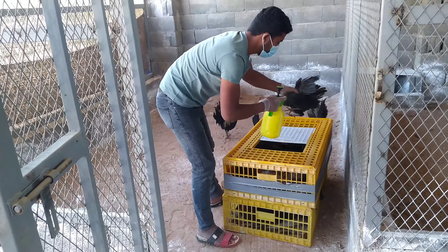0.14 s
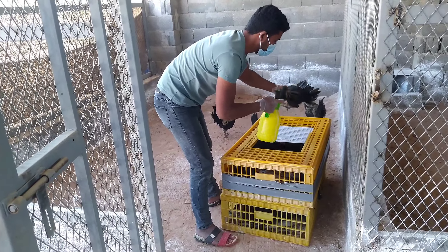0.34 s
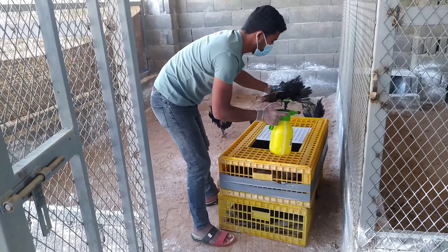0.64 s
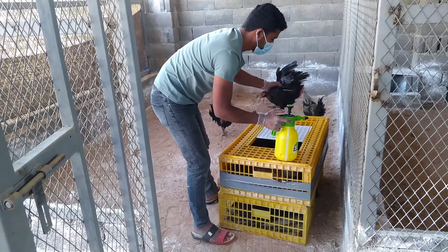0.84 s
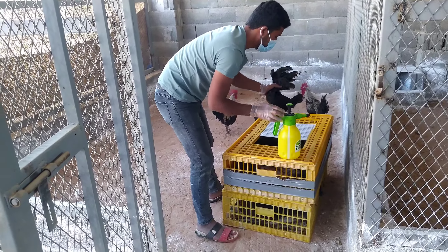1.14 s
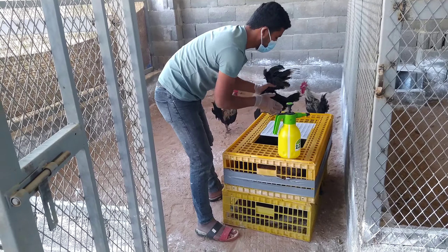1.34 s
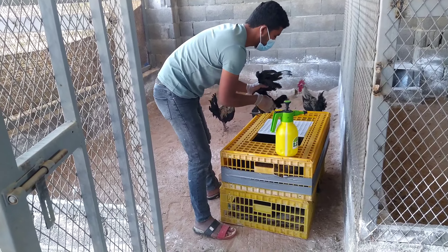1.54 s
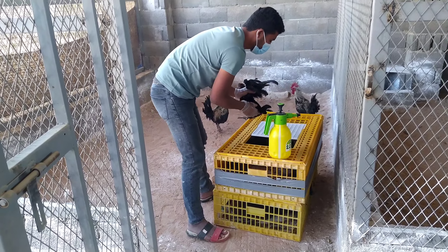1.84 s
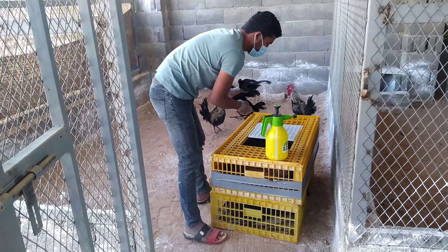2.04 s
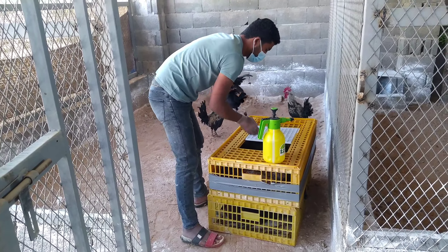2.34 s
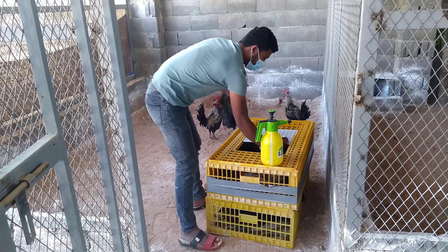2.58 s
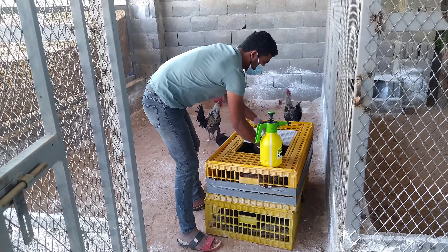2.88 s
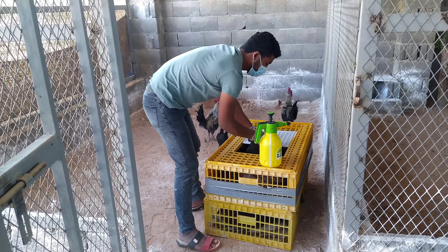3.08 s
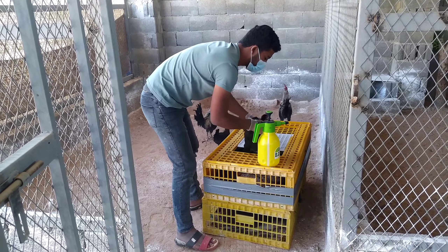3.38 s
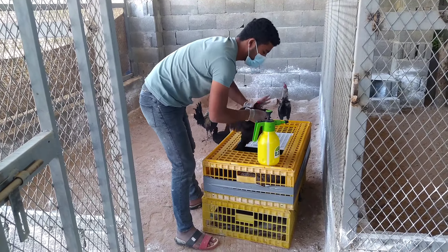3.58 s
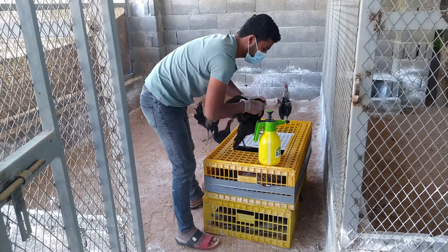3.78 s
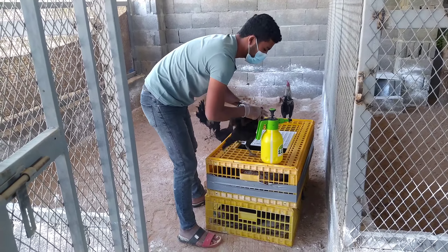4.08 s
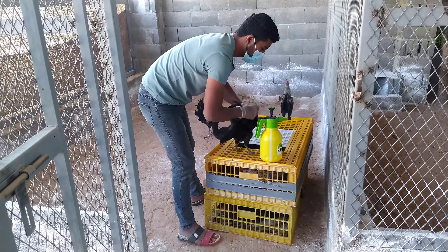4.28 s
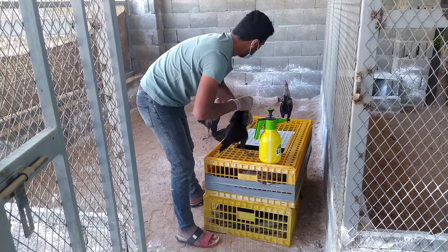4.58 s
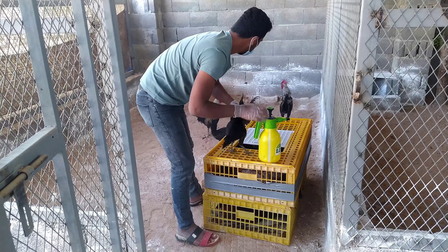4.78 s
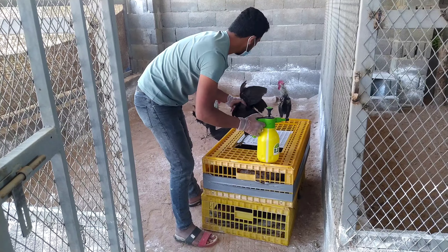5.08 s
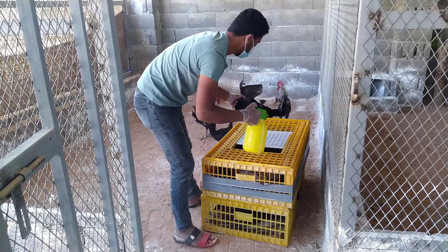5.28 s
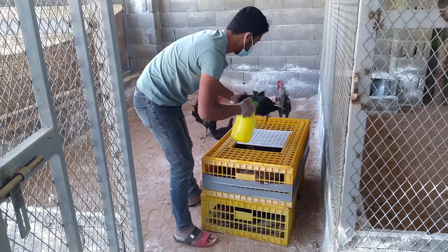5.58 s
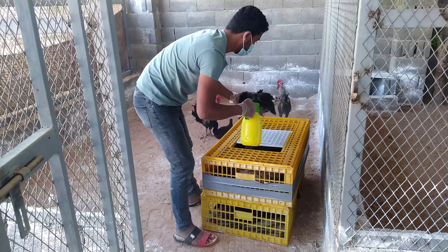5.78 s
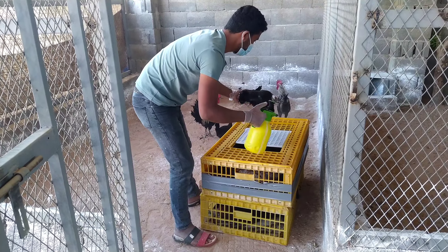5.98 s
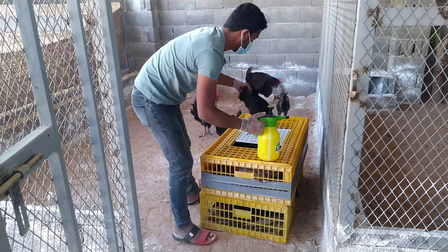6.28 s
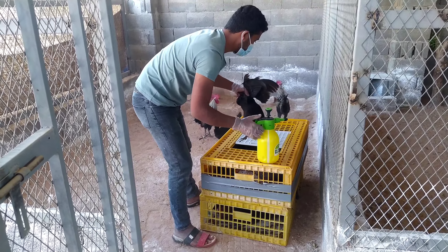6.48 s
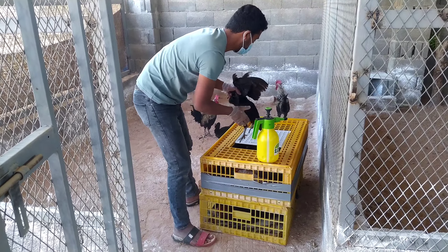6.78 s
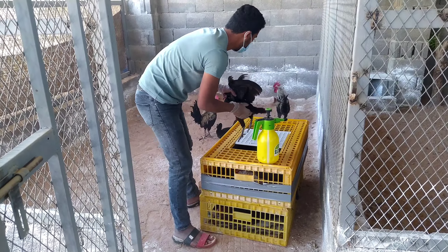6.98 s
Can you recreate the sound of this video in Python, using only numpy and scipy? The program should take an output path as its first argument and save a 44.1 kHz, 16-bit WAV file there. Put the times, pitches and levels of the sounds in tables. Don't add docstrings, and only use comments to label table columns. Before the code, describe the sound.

A stereo phone captures a chicken pen with hard walls, short bright echoes, hissy air and a blurred distant flock. A short peep and a cluck open, then a hoarse squawk until 0.4 s, another at 0.6-0.95 and a third at 1.25-1.5. From 0.9 a second bird clucks about five times a second, with dull plastic bumps and soft rustles. A rasp swells from 1.9 to 2.2, then a short grunt at 2.5. Claws scrabble at 2.8; a piercing, loud scream bursts at 2.95-3.15 and a second at 3.3-3.6, with a crate thump. After a brief lull, wings swish and a long strained cry runs 3.85-4.5, its clear note breaking through the rasp. A softer squawk fills 4.8-5.25. Steady clucks return from 5.2 to 6.2, with faint neighbours and thin whistles. Brushing and a knock come at 6.5, then low groans beneath a last hoarse squawk to 7.1.

```python
import sys
import numpy as np
from scipy import signal
from scipy.fft import rfft, irfft, next_fast_len
from scipy.io import wavfile
from scipy.ndimage import uniform_filter1d

SR = 44100
rng = np.random.default_rng(int(sys.argv[2]) if len(sys.argv) > 2 else 0)


def volts(x):
    e = np.asarray(x, float) / 20
    return 10 ** e


def generate_wav(signal):
    frames = np.transpose(np.atleast_2d(signal))
    scaled = np.clip(frames, -1, 1) * 32767
    pcm = np.round(scaled).astype(np.int16)
    wavfile.write(sys.argv[1], SR, pcm)


N = 314433

# (start [s], length [s], start pitch [Hz], end pitch [Hz], level of the lowest partial [dB])
LOCKED_NOTES = [
    (0.215, 0.09, 715, 652, -37),
    (2.97, 0.15, 712, 700, -29),
    (3.348, 0.108, 710, 701, -29.5),
    (4.11, 0.14, 745, 735, -36),
]


def evened(x):
    return x / np.sqrt(np.mean(x ** 2) + 1e-20)


def read(points, hz):
    f, value = np.transpose(points)
    return np.interp(np.log(hz + 1), np.log(f + 1), value)


def shaped(x, points):
    size = next_fast_len(len(x))
    gain = volts(read(points, np.fft.rfftfreq(size, 1 / SR)))
    return irfft(rfft(x, size) * gain, size)[:len(x)]


def add(mix, s, sound):
    part = mix[round(s * SR):][:len(sound)]
    part += sound[:len(part)]


def resonate(x, hz, width_hz):
    turn = np.exp(2j * np.pi * np.cumsum(hz * np.ones(len(x))) / SR)
    r = np.exp(-np.pi * width_hz / SR)
    smooth = signal.lfilter([(1 - r) ** 2], [1, -2 * r, r * r], x / turn + 1e-18)
    return 2 * (turn * smooth).real


def wobble(count, seconds):
    return evened(uniform_filter1d(rng.standard_normal(count), max(round(seconds * SR), 1)))


def both_ports(a, b, hz):
    # (frequency [Hz], likeness at both ports [0-1])
    likeness = [(30, .4), (90, .85), (200, .96), (700, .93), (1300, .3), (5000, .1)]
    same = np.clip(read(likeness, hz), -1, 1)[:, None]
    return np.array([a, same * a + np.sqrt(1 - same ** 2) * b])


def background(colour, patch_db, swell):
    # (frequency [Hz], share [0-1])
    gusty = [(60, .15), (300, .5), (1000, .8), (4000, .6), (8000, .3)]
    # (frequency [Hz], share [0-1])
    swell_share = [(500, 0), (2500, 1)]
    frames, hz = N // 256 + 5, np.fft.rfftfreq(1024, 1 / SR)
    a, b, c, d, patches = rng.standard_normal((frames, 513, 5)).T
    patches = evened(uniform_filter1d(uniform_filter1d(patches, 6, 0), 12, 1))
    frame_s = (np.arange(frames) - 2) * 256 / SR
    level_db = read(colour, hz)[:, None] + patch_db * patches * read(gusty, hz)[:, None]
    level_db = level_db + read(swell_share, hz)[:, None] * np.interp(frame_s, *np.transpose(swell))
    z = both_ports(a + 1j * b, c + 1j * d, hz) * volts(level_db)
    return evened(signal.istft(z, nperseg=1024, noverlap=768)[1][:, :N])


def yard():
    # (frequency [Hz], level per Hz [dB])
    air_colour = [(12, -24), (20, 3.5), (119, -7), (352, -1), (491, -9.5), (857, -13.5), (1040, -29),
                  (1720, -15), (2540, -12.5), (4070, -18.5), (5090, -18.5), (7100, -19), (9120, -11.5),
                  (12400, -26), (15500, -32)]
    # (time [s], level change [dB])
    treble_swell = [(0, 3), (.5, 7.5), (1, 2), (1.7, 2), (2.3, 3.5), (3.7, 1), (4.65, 5), (5.3, 1.5),
                    (5.55, -4.5), (5.7, 4.5), (6.1, 2), (6.4, -3), (6.6, 3.5), (7.13, 5)]
    # (time [s], level [dB])
    flock = [(0.0, -38), (.5, -48.5), (1.81, -51), (2.08, -36), (2.28, -46.5), (3.39, -33.5), (3.81, -47.5),
             (4.21, -28), (4.67, -48), (5.04, -28), (5.2, -39), (5.6, -44), (6.12, -52), (6.55, -49),
             (6.91, -28.5), (7.13, -34.5)]
    flock_colour = [(250, -23.0), (400, -15.5), (850, -1.0), (1400, -1.5), (2500, -4.0), (3500, -21.5)]  # (Hz, dB)
    air = background(air_colour, patch_db=6.5, swell=treble_swell)
    far = background(flock_colour, patch_db=4.5, swell=[(0, 0)])
    flock_db = np.interp(np.arange(N) / SR, *np.transpose(flock))
    return volts(-50.5) * air + volts(flock_db - 6.0) * far


def knocks():
    # (time [s], peak level [dB], panel pitch [Hz], time to die away by 60 dB [s])
    bumps = [(0.681, -37, 177, 0.035), (1.095, -39, 299, 0.058), (2.575, -35, 300, 0.038),
             (2.809, -43, 336, 0.16), (2.86, -37.5, 150, 0.077), (3.081, -42.5, 166, 0.16),
             (3.304, -24, 317, 0.031), (4.0, -39, 268, 0.033), (5.011, -40.5, 310, 0.043),
             (6.518, -44, 261, 0.054), (6.987, -48, 313, 0.065), (1.798, -51, 171, .08),
             (0.13, -49, 200, .08), (2.64, -48, 172, 0.074)]
    # (time [s], peak level [dB])
    claws = [
        (0.1878, -33),
        (1.085, -50),
        (1.166, -40),
        (1.6674, -39.5),
        (2.809, -26.5),
        (2.834, -34),
        (2.8767, -29.5),
        (3.306, -34),
        (3.834, -55),
        (6.542, -42),
    ]
    out, t = np.zeros(N), np.arange(9000) / SR
    for s, db, hz, t60 in bumps:
        modes = [(1, 4.5), (1.6, -10), (2.7, -3)]  # (times the panel pitch, dB)
        panel = sum(volts(d) * np.sin(2 * np.pi * hz * k * t) for k, d in modes)
        add(out, s, volts(db - 60 * t / t60) * panel * (1 - np.exp(-t / 0.00095)))
    for s, db in claws:
        grit = uniform_filter1d(rng.standard_normal(len(t)), size=2)
        add(out, s, volts(db + 7.5 - 60 * t / 0.023) * np.minimum(t / 0.001, 1) * grit)
    return out


def brushing():
    # (start [s], length [s], peak level [dB])
    rustles = [
        (1.069, 0.19, -43.5),
        (1.629, 0.22, -48),
        (2.784, 0.89, -42),
        (0.182, 0.039, -56),
        (3.987, 0.072, -37.5),
        (5.2, .08, -50),
        (6.512, 0.081, -39.5),
    ]
    # (start [s], length [s], peak level [dB])
    wings = [
        (3.865, 0.068, -43),
        (4.02, .07, -35),
        (4.19, .07, -35),
        (2.955, 0.037, -32),
    ]
    # (frequency [Hz], level per Hz [dB])
    brush_colour = [(88, -45), (150, 2.5), (701, -4.5), (1700, -5.5), (1870, -6), (2360, -6), (3750, -18),
                    (8920, -13), (15000, -43)]
    # (frequency [Hz], level per Hz [dB])
    swish_colour = [(900, -40), (2000, -8), (5000, 5), (8000, -4), (13000, -18)]
    out = np.zeros(N)
    for rows, colour in [(rustles, brush_colour), (wings, swish_colour)]:
        for s, seconds, peak_db in rows:
            t = np.arange(0, seconds, 1 / SR)
            stroke = np.minimum(t / 0.015, 1) * volts(peak_db - 22 * t / seconds)
            grains = rng.standard_normal(len(t)) * volts(1.7 * wobble(len(t), 0.0061))
            add(out, s, stroke * evened(shaped(grains, colour)))
    return out


def cluck(s, db, hz, low_db, seconds):
    # (frequency [Hz], width [Hz], level [dB])
    throat_tones = [(870, 363, 15), (1330, 166, 3), (2340, 3400, -15.5), (4320, 230, -26)]
    # (time [s], share of rise and breath [0-1])
    looseness = [(5.7, 1), (5.76, .5), (5.9, 1)]
    lead_in_s = .006
    u = np.arange(0, 1, 1 / ((seconds + lead_in_s) * SR))
    loose = np.interp(s, *np.transpose(looseness))
    rise = 0.2022 * (np.sin(np.pi * .65 * u) - .75) + 0.076 * wobble(len(u), 0.0023)
    turns = np.cumsum(hz / 2 * (1 + loose * rise)) / SR
    pulses = sum(np.cos(2 * np.pi * k * turns) for k in range(2, 10))
    pulses = pulses + 2.23 * loose * rng.standard_normal(len(u))
    throat = evened(sum(volts(d) * resonate(pulses, f, w) for f, w, d in throat_tones))
    voice = throat + volts(low_db - 2.0) * np.cos(2 * np.pi * turns)
    throb = 1 + .28 * np.cos(2 * np.pi * (70 * u * seconds + rng.random()))
    shape = np.sin(np.pi * u ** 0.95) ** 1.92 * throb * volts(1.84 * wobble(len(u), 0.0085))
    return s - .007 - lead_in_s, volts(db - 4.5) * voice * shape


def neighbours():
    # (time [s], peak level [dB], second partial [Hz], lowest partial against it [dB], length [s])
    faint_clucks = [
        (5.30, -47, 1000, -20, .05),
        (5.44, -47, 1400, -25, .05),
        (5.51, -43, 1350, -25, .05),
        (5.70, -48, 800, -20, .06),
        (5.70, -48, 1500, -25, .04),
        (5.85, -50, 1150, -25, .06),
        (6.01, -47, 1430, -25, .05),
    ]
    out = np.zeros(N)
    for s, db, hz, low_db, seconds in faint_clucks:
        start, sound = cluck(s, db, hz, low_db, seconds)
        add(out, start, 2 * resonate(sound, hz, 500))
    return out


def clucking_bird():
    # (time [s], peak level [dB], second partial [Hz], lowest partial against it [dB], length [s])
    beat = [(0.114, -28.5, 896, -9.5, 0.046), (0.914, -33, 780, -9, 0.049), (1.078, -26, 872, -18, 0.054),
            (1.275, -31.5, 764, -11, 0.062), (1.454, -27.5, 802, -14.5, 0.05),
            (1.642, -24.5, 935, -21, 0.058), (1.834, -26, 849, -17, 0.054), (2.052, -30, 872, -17.5, 0.073),
            (2.215, -38, 829, 10, 0.077), (2.245, -21.5, 910.5, -11, 0.065),
            (2.453, -26, 834, -17.5, 0.056), (2.653, -30, 772, -11.5, 0.062), (2.831, -27, 806, -14, 0.044),
            (2.93, -24.5, 900, -33, 0.049), (3.233, -24.5, 994, -19, 0.068), (4.573, -38, 650, 0.5, 0.053),
            (4.711, -43, 1003, -30, 0.048), (4.771, -27, 828, -14, 0.048), (5.172, -26.5, 950, -12, 0.048),
            (5.37, -22.5, 913.5, -12, 0.047), (5.561, -23.5, 837, -16, 0.061),
            (5.766, -25.5, 804.5, -14, 0.074), (5.956, -23, 870, -13, 0.057),
            (6.201, -22.5, 914, -16, 0.048)]
    out = np.zeros(N)
    for row in beat:
        add(out, *cluck(*row))
    return out


def tone(s, seconds, start_hz, end_hz, db, partials, unsteady, soft, flicker_db=0):
    count = round(seconds * SR)
    u = np.linspace(0, 1, count)
    glide_hz = np.linspace(start_hz, end_hz, count)
    turns = np.cumsum(glide_hz * (1 + unsteady * wobble(count, 0.0079))) / SR
    stack = volts(flicker_db * wobble(count, .012)) * np.sin(2 * np.pi * turns)
    for k, d, strongest_at in partials:
        bloom = np.exp(-((u - strongest_at) / .28) ** 2 / 2)
        flicker = volts(d + flicker_db * wobble(count, 0.016))
        stack = stack + flicker * bloom * np.sin(2 * np.pi * round(k) * turns)
    return s, np.sqrt(2) * volts(db - 1.5) * stack * signal.windows.tukey(count, np.clip(soft, 0, 1))


def groans():
    # (start [s], length [s], start pitch [Hz], end pitch [Hz], level [dB])
    low_calls = [
        (6.735, .04, 215, 185, -50),
        (6.77, .12, 168, 155, -51),
        (6.99, .135, 158, 163, -52),
        (6.54, .07, 165, 165, -57),
    ]
    out = np.zeros(N)
    for row in low_calls:
        add(out, *tone(*row, [(2, -1.1, 0.36)], unsteady=0.021, soft=0.35, flicker_db=2.0))
    return out


def whistles():
    # (start [s], length [s], start pitch [Hz], end pitch [Hz], level [dB])
    peeps = [
        (0.061, 0.025, 1475, 1447, -27),
        (0.49, 0.12, 1195, 1237, -53.5),
        (0.939, .08, 766, 780, -58),
        (1.472, 0.23, 2920, 2950, -49.5),
        (5.513, 0.042, 1324, 1424, -45),
        (5.805, 0.138, 786, 824, -43.5),
        (4.708, .035, 950, 1013, -42.5),
        (5.428, .05, 1460, 1360, -51),
        (5.688, 0.053, 1240, 1330, -47.5),
    ]
    out = np.zeros(N)
    for row in peeps:
        add(out, *tone(*row, [], unsteady=0.0032, soft=0.35))
    return out


def clear_notes():
    # (multiple, level [dB], share of the note where it is strongest [0-1])
    partials = [
        [(2, -5, 0.55), (3, 7, 0.85), (4, 10, 0.77), (5, -7, .6)],
        [(2, -16, .4), (3, 9, 0.18), (4, -8, .6), (6, -12, 0.63)],
        [(2, -8, .3), (3, 6.5, 0.61), (4, 6, 0.83), (5, 1, 0.58), (6, -4, .6), (8, -10, .5), (10, -5.5, 0.52),
         (12, 1, 0.6)],
        [(2, 9, 0.43), (3, 14, 0.45), (4, -12, .5)],
    ]
    tremble = (.012, .018, .008, .016)
    # (start [s], length [s], start pitch [Hz], end pitch [Hz], level [dB])
    streaks = [(0.078, 0.05, 1800, 1920, -32.5), (0.12, 0.048, 1950, 1800, -29),
               (.17, 0.069, 1400, 1560, -34), (0.1, 0.072, 3880, 3860, -39),
               (0.14, 0.026, 2700, 2350, -33.5), (.2, .06, 2000, 2150, -33),
               (.26, 0.061, 2050, 1750, -34.5), (4.15, 0.066, 1530, 1480, -34),
               (4.19, 0.038, 1680, 1695, -33), (3.995, 0.0346, 2180, 2600, -27),
               (4.045, 0.0524, 920, 930, -33), (3.325, 0.054, 2150, 2125, -32),
               (3.505, .065, 2100, 2095, -29), (3.51, .05, 2810, 2790, -28), (3.1, .04, 2690, 1900, -30),
               (2.985, 0.116, 1560, 1555, -23.5), (2.96, 0.164, 1900, 1905, -30),
               (2.98, .12, 2745, 2765, -25.5), (3.04, 0.062, 4135, 4140, -29),
               (3.0, 0.039, 2065, 2055, -21), (2.955, 0.027, 4650, 4650, -28),
               (4.06, .05, 940, 1000, -30.5), (4.24, .05, 1410, 1415, -32),
               (4.22, 0.055, 1856, 1860, -25.5), (4.4, .09, 850, 920, -31), (6, .16, 720, 1400, -50),
               (7.5, .12, 980, 930, -36), (1.27, 0.197, 4480, 4600, -49), (2.95, 0.031, 2050, 1800, -28),
               (6.92, 0.122, 2700, 2600, -37), (0.64, 0.212, 1495, 1540, -35),
               (1.264, 0.078, 2200, 1900, -38), (1.39, 0.072, 2500, 3000, -41.5),
               (2.0, 0.138, 2500, 1700, -40), (1.9, 0.18, 2100, 4400, -48), (2.945, 0.042, 985, 1000, -29),
               (3.828, 0.0295, 880, 930, -40.5), (1.33, 0.077, 1700, 1690, -38),
               (0.71, 0.077, 2260, 2000, -40), (3.48, .07, 2230, 2180, -26), (4.7, .17, 930, 990, -46)]
    out = np.zeros(N)
    for row, upper, unsteady in zip(LOCKED_NOTES, partials, tremble):
        add(out, *tone(*row, upper, unsteady, soft=0.37, flicker_db=2.5))
    for row in streaks:
        add(out, *tone(*row, [], unsteady=.018, soft=0.4, flicker_db=3))
    return out


def squawk(rows, airway, blend, tops, manner):
    pipe_width_hz, head_width_hz = (252, 2800)
    # (frequency [Hz], width [Hz], level [dB])
    hiss_tones = [(6240, 3460, 14.5), (8325, 2500, 15.5), (10450, 1300, -3), (12000, 2400, -18)]
    # (frequency [Hz], share [0-1])
    hiss_core = [(6000, 1), (7000, 0), (10300, 0), (11300, 1)]
    # (frequency [Hz], level [dB])
    pocket = [(3120, 0), (3270, -16), (3420, 0)]
    s, effort_points, beak_points = np.transpose(rows)
    t = np.arange(s[0], s[-1], 1 / SR)
    count = len(t)
    effort_db, beak_hz = np.interp(t, s, effort_points), np.interp(t, s, beak_points)
    pipe_hz, throat_hz = np.linspace(airway[::2], airway[1::2], count).T
    pipe_db, throat_db, palate_db, hiss_db, growth_db = blend
    edge_hz, tongue_db, palate_hz, swell_db, throat_width_hz = tops
    beak_width_hz, head_hz, head_db, slap_hz, uneven = manner
    uneven = np.clip(uneven, .1, .35)

    slack_db = np.minimum(effort_db.max() - effort_db, 44)
    over_call = np.linspace(-.5, .5, count)
    pipe_db = pipe_db + 0.052 * slack_db
    throat_db = throat_db + 0.081 * slack_db
    hiss_db = hiss_db + 0.052 * slack_db + growth_db * over_call
    head_db = head_db + swell_db * over_call - 0.5 - 0.061 * slack_db

    turns = np.cumsum(slap_hz * np.exp(uneven * wobble(count, .004))) / SR
    slap_size = volts(5.1 * uneven * np.minimum(wobble(count, 0.0022), 2))
    slaps = (np.diff(np.floor(turns), prepend=0) > 0) * slap_size
    puffs = evened(signal.lfilter([1], [1, -.96], slaps) * rng.standard_normal(count))
    drive = evened(slaps - slaps.mean()) + 2.6 * uneven * puffs

    tract = [(beak_hz, beak_width_hz, 0), (pipe_hz, pipe_width_hz, pipe_db), (throat_hz, throat_width_hz, throat_db),
             (head_hz, head_width_hz, head_db), (palate_hz, 200, palate_db)]
    voice = np.zeros(count)
    for k, (hz, width_hz, db) in enumerate(tract):
        drifting_hz = hz * (1 + .02 * wobble(count, .05))
        voice += (-1) ** k * volts(db) * evened(resonate(drive, drifting_hz, width_hz))
    voice = signal.sosfilt(signal.butter(7, [640, edge_hz], 'band', fs=SR, output='sos'), voice)
    if effort_db.max() > -16:
        voice = shaped(voice, pocket)

    air = evened(sum(volts(db) * evened(resonate(puffs, hz, w)) for hz, w, db in hiss_tones))
    air = shaped(air, [(hz, tongue_db * share) for hz, share in hiss_core])
    rasp_db = 1.97 * wobble(count, 0.0089)
    loudness = volts(effort_db - 3.5 + rasp_db) * signal.windows.tukey(count, .03)
    return t[0], loudness * (voice + volts(hiss_db) * air)


def held_hen():
    # (time [s], effort [dB], beak resonance as the mouth opens [Hz])
    first_hen = [
        [(0.068, -38.5, 2120), (0.11, -40.5, 2100), (0.184, -31, 2310), (0.282, -25.5, 2090), (0.37, -77, 1970)],
        [(0.61, -45.5, 2230), (0.646, -38.5, 2140), (0.728, -33.5, 2640), (0.856, -30.5, 1960),
         (0.95, -76, 2050)],
        [(1.243, -40, 2020), (1.278, -40, 2380), (1.372, -38, 2480), (1.434, -28.5, 2050), (1.52, -66, 2240)],
        [(1.86, -40, 2400), (1.884, -34.5, 2300), (1.998, -28, 2380), (2.106, -24, 2160), (2.23, -51, 1840)],
        [(2.48, -55, 2270), (2.502, -38.5, 2270), (2.606, -41, 2150), (2.64, -69, 2180)],
        [(2.75, -48, 2280), (2.80, -35, 2240), (2.835, -35.5, 2180), (2.87, -51, 2070)],
        [(2.89, -41.5, 2000), (2.95, -35, 1900), (2.966, -18, 1960), (3.024, -10.5, 1980), (3.09, -15, 1900),
         (3.15, -56, 2000)],
        [(3.303, -35, 2220), (3.33, -26.5, 2230), (3.44, -15, 2340), (3.465, -25.5, 2200), (3.53, -19.5, 2270),
         (3.58, -36.5, 2550), (3.62, -42, 2560)],
    ]
    # (time [s], effort [dB], beak resonance [Hz])
    second_hen = [
        [(3.828, -56, 2330), (3.862, -41, 2250), (4.018, -25, 2140), (4.125, -28.5, 2180), (4.15, -16.5, 2170),
         (4.27, -23, 2350), (4.36, -25, 2420), (4.498, -32.5, 2450), (4.55, -110, 2440)],
        [(4.77, -46, 2550), (4.806, -36, 2500), (4.946, -27.5, 2680), (5.02, -25.5, 2660), (5.09, -27, 2530),
         (5.192, -32, 2470), (5.27, -58, 2520)],
        [(6.58, -51.5, 2530), (6.72, -37.5, 2630), (6.86, -31.5, 2530), (6.98, -32, 2710), (7.056, -32.5, 2660),
         (7.13, -30.5, 2570)],
    ]
    # (windpipe start [Hz], windpipe end [Hz], throat start [Hz], throat end [Hz])
    airways = [(900, 850, 1860, 1640), (930, 590, 1550, 1620), (800, 920, 1570, 1800),
               (900, 710, 1810, 1720), (841, 710, 1490, 1860), (810, 850, 1770, 1320),
               (1020, 630, 1680, 1490), (950, 1010, 1460, 1630), (983, 893, 1750, 1590),
               (1086, 864, 1550, 1500), (950, 950, 1440, 1890)]
    # (windpipe [dB], throat [dB], palate [dB], hiss [dB],
    # hiss growth over the call [dB])
    blends = [(-11.5, 3, -23, -7, 5.5), (-15.5, -3.5, -10.5, -12.5, 5), (-12, -0.5, -11, -21.5, -8),
              (-16.5, -3.5, -10.5, -13, -3), (-12, 3.5, -17, -15.5, -5), (-27, 3.5, -27, -13, 14),
              (-18.5, -6.5, -10.5, -11, -24), (-15, -19, -10, -9, -3), (-10.5, -5, -11, -12.5, 6),
              (-8.5, -12, -21, -7.5, -1), (-5, -9, -6, -4, -4.5)]
    # (airway's upper edge [Hz], hiss outside its core [dB], palate cavity [Hz],
    # head growth over the call [dB], throat width [Hz])
    all_tops = [(5000, -5.5, 2700, -3, 300), (4450, -11, 2670, 3, 350), (4930, 3, 2200, -5, 350),
                (4900, -16, 2780, -5, 360), (4900, -5, 2780, -6, 380), (5740, 2, 2780, -2, 340),
                (5440, 2, 2500, 3, 410), (5850, 1.5, 2780, -3, 260), (5540, 1, 3320, 2, 730),
                (5170, -3.5, 2600, -5, 400), (5400, -0.5, 2290, -3, 580)]
    # (beak width [Hz], head resonance [Hz], head level [dB], slap rate [Hz], unevenness [0-1])
    manners = [(420, 3700, -3.5, 640, 0.1), (574, 3800, -6, 750, 0.2), (387, 4160, -10, 570, 0.2),
               (475, 4340, -10.5, 700, 0.1), (510, 4400, -10.5, 1100, 0.5), (490, 4900, -16, 590, 0.2),
               (500, 4600, -7, 700, .15), (464, 3600, -8.5, 700, 0.1), (546, 5060, -11, 750, .3),
               (680, 4170, -7, 900, .3), (457, 4300, 0.5, 900, 0.2)]
    lock_drops = (-9, -8, -13, -5)
    rasp, locked_db = np.zeros(N), np.zeros(N)
    for settings in zip(first_hen + second_hen, airways, blends, all_tops, manners):
        add(rasp, *squawk(*settings))
    for (s, seconds, *_), drop_db in zip(LOCKED_NOTES, lock_drops):
        add(locked_db, s, drop_db * signal.windows.tukey(round(seconds * SR), .5))
    return rasp * volts(locked_db)


def pen(x, wet_db):
    # (frequency [Hz], time for echoes to die away by 60 dB [s])
    walls = [(150, 0.14), (700, 0.28), (2000, 0.29), (5000, 0.14), (12000, 0.099)]
    # (frequency [Hz], phase [radians])
    lead = [(900, .05), (1500, 1.9), (2300, -1.7), (3600, 1.7), (5500, -1.7), (14000, -20)]
    # (frequency [Hz], level [dB])
    louder = [(150, -1.5), (380, 3.5), (950, 0.5), (2380, 5.5), (5980, -2.5), (15000, 4.5)]
    # (frequency [Hz], level [dB])
    mic = [(60, -35), (140, 0.5), (4700, 0), (5300, -1), (6400, 1.5), (7200, 1), (10500, 2.5), (12000, 1.5),
           (15000, -8), (15600, -63)]
    # (frequency [Hz], level [dB])
    sheen = [(2500, 0.5), (5000, 5), (10000, 5.5)]
    size = next_fast_len(N + SR // 2)
    hz = np.fft.rfftfreq(size, 1 / SR)
    taps = np.zeros((2, SR // 2))
    at = np.arange(200, SR // 2 - 20, 20) + rng.integers(0, 20, (2, (SR // 2 - 201) // 20))
    np.put_along_axis(taps, at, rng.choice([-1., 1.], at.shape), 1)
    f, t, z = signal.stft(taps, SR, nperseg=256)
    fading = both_ports(*z, f) * volts(-60 * t / read(walls, f)[:, None])
    tail = signal.istft(fading, SR, nperseg=256)[1]
    side = np.array([[.5], [-.5]])
    direct = np.exp(1j * side * read(lead, hz))
    echoes = volts(wet_db + read(sheen, hz)) * rfft(tail, size) / np.linalg.norm(tail[0])
    port = volts(read(mic, hz) + side * read(louder, hz))
    return irfft(rfft(x, size) * (direct + echoes) * port, size)[:, :N]


def scene():
    crate = volts(-3.5) * (knocks() + brushing())
    roomy = neighbours() + crate + held_hen()
    drier = crate + clucking_bird() + groans() + whistles() + clear_notes()
    return yard() + pen(drier, wet_db=-11) + pen(roomy, wet_db=-0.5)


def low_pass(x):
    return signal.sosfilt(signal.butter(12, 15630, fs=SR, output="sos"), x)


def record(dry):
    # (frequency [Hz], share of small patches muted [0-1])
    muted_share = [(3900, 0), (4600, .2), (5300, .52), (6600, .5), (7200, .2), (7800, .1), (9800, .12),
                   (11000, .45), (13000, .6)]
    rounded = dry / (1 + abs(dry / .9) ** 4) ** .25
    hz, t, z = signal.stft(rounded, SR, nperseg=1024)
    bands, frames = np.arange(len(hz)) // 4, np.arange(len(t)) // 4
    chance = rng.random((frames[-1] + 1, bands[-1] + 1)).T[bands][:, frames]
    heard = chance > read(muted_share, hz)[:, None]
    below_edge = (hz < 15430)[:, None]
    mixed = signal.istft(z * heard * below_edge, SR, nperseg=1024)[1][:, :N]
    return low_pass(mixed)


dry = scene()
out = record(dry)
generate_wav(out)
```